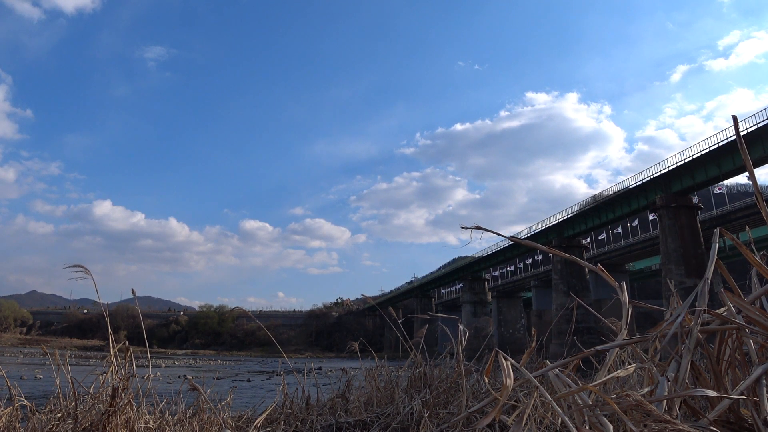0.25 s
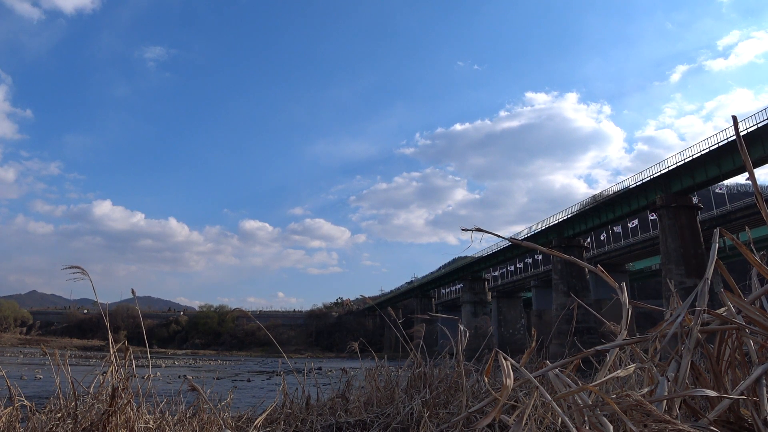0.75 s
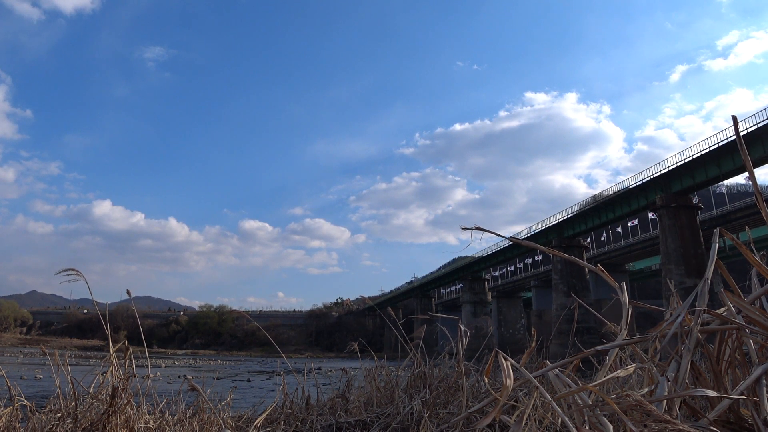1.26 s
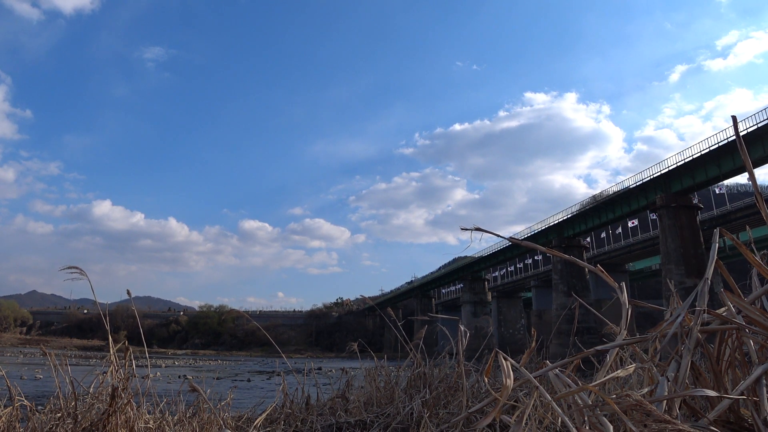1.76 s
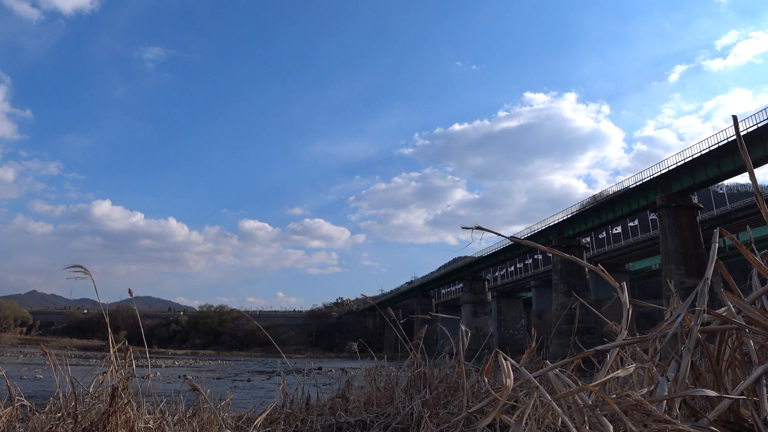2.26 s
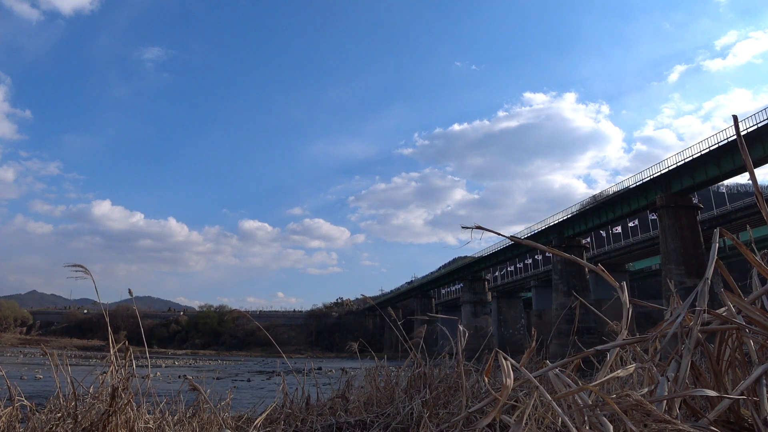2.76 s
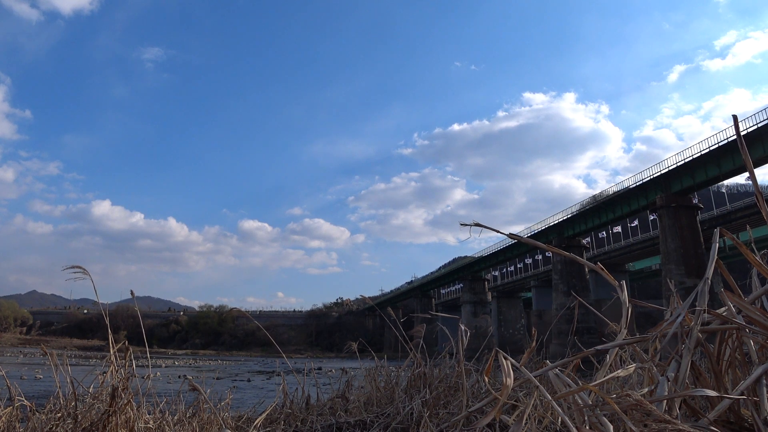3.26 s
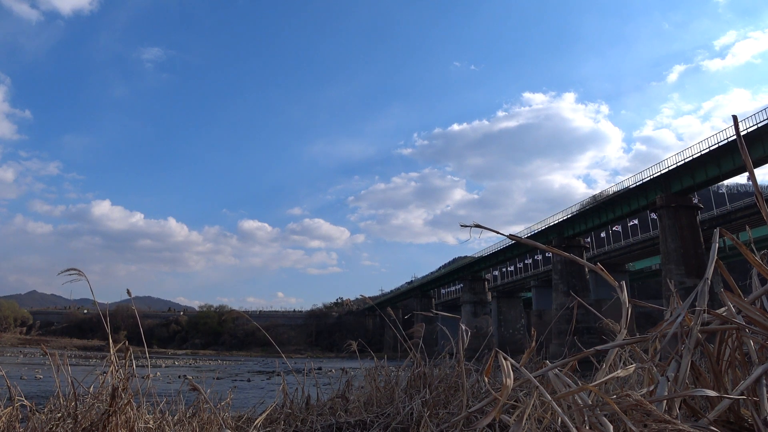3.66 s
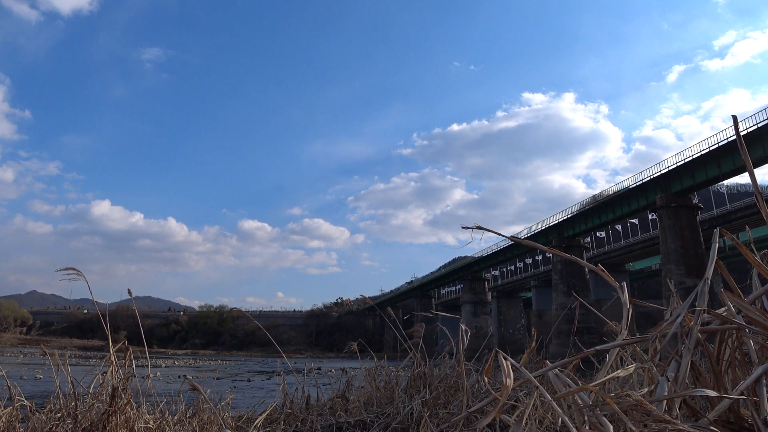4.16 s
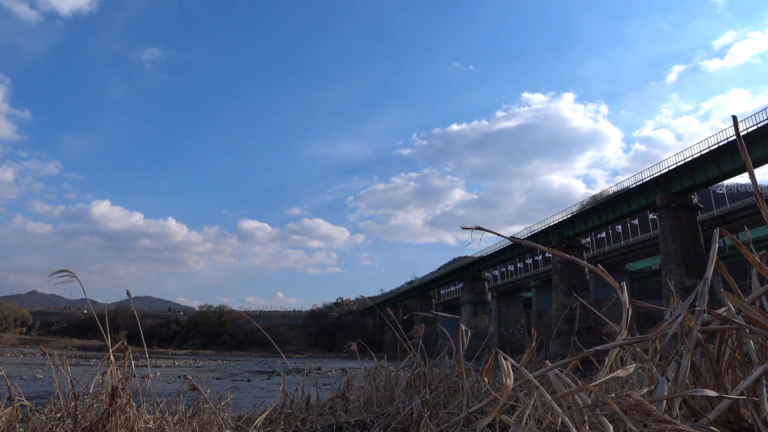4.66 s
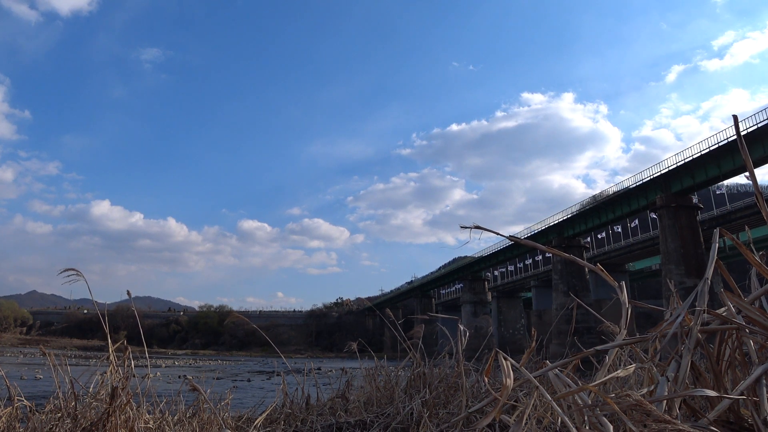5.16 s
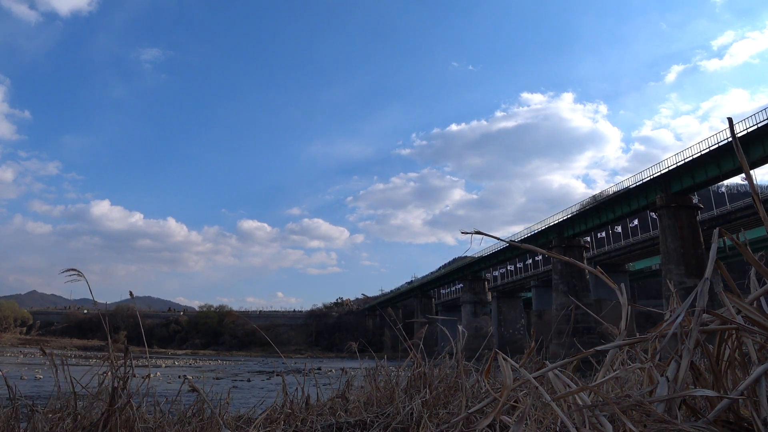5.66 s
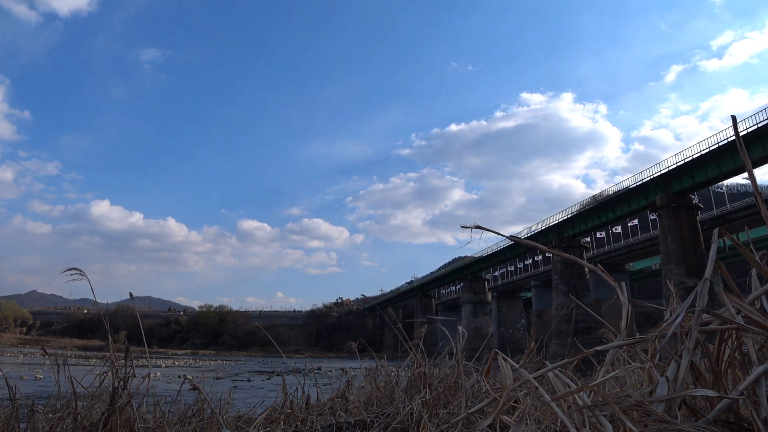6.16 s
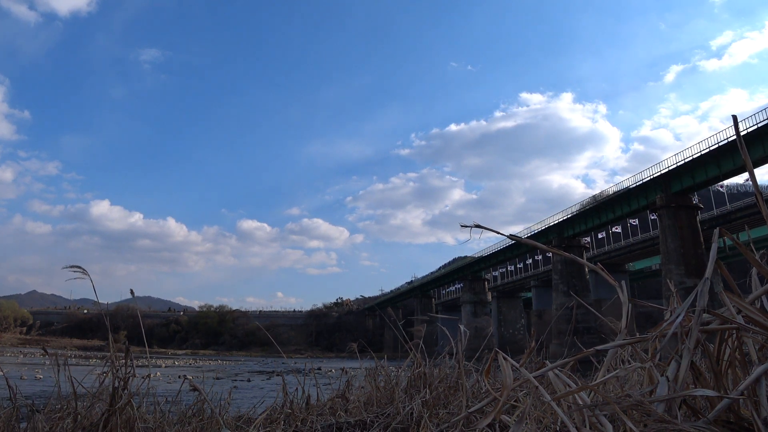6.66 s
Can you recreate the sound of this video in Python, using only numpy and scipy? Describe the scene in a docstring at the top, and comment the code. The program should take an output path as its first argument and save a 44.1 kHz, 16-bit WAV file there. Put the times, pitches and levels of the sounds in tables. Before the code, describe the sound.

Heard from below, a train's low rumble and wheel hiss build across a railway bridge, with booming spans, rattling steel and thin rapid squeaks.

```python
"""A deep rumble and a roar swell as a diesel railcar draws nearer on a girder bridge, heard from below.
Shaped noise with narrow humming and ringing tones makes the rumble, the wheels and the rails; gliding sines
make the deck's booms and the engine's hum. Bursts of noise with rising rings make the clanks of loose steel.
Thin squeaks in quick runs, small bright ticks and a faint twitter lie on top."""
import sys
import numpy as np
from scipy import signal
from scipy.fft import rfft, irfft, next_fast_len
from scipy.io import wavfile
from scipy.ndimage import uniform_filter1d, map_coordinates

SR = 44100
rng = np.random.default_rng(int(sys.argv[2]) if len(sys.argv) > 2 else 0)


def store_pcm(level_fs):
    """Save levels as 16-bit WAV."""
    pcm = np.round(np.clip(level_fs, -1, 1) * 32767).astype(np.int16)
    wavfile.write(sys.argv[1], SR, np.atleast_2d(pcm).T)


N = 304731

# The wheel hiss over time. Each row: time in seconds, level before the trims in dB.
HISS_LEVEL = [(0, -53.5), (.27, -57), (1.15, -55), (2.3, -52), (2.52, -49.5), (2.88, -52), (3.6, -48.5),
              (4.1, -47), (4.24, -49.5), (4.47, -45.5), (5.08, -46.5), (5.27, -44), (5.4, -46),
              (5.56, -42.8), (5.85, -43), (6.34, -47), (6.52, -44.3), (6.7, -43), (6.9, -44)]
# The upper rings of every tick. Each row: pitch in Hz, width in Hz, relative level in dB.
UPPER_TICK_MODES = [(11850, 650, 0), (12700, 500, -8)]
RUB_PERIOD_S = .0585  # pace of the squeaks and of the fainter ticks


def girders(uneven_db=0.64):
    """Wheel roughness drums the webs, harder on a loaded span; stiffer flanges emerge as the train nears."""
    # Colour of the webs' rumble. Each row: frequency in Hz, relative density in dB.
    web_spectrum = [(20, -25), (32, -8), (55, 0), (75, 0), (100, 0), (150, 0.5), (205, -0.5), (235, -5.5),
                    (350, -37), (590, -80)]
    # Colour of the flanges. Each row: frequency in Hz, relative density in dB.
    flange_spectrum = [(130, -63), (230, -3), (290, -1), (350, -5), (430, -5.5), (520, -8.5), (580, -15),
                       (660, -19), (830, -44), (1400, -100)]
    # Narrow humming tones within the low rumble. Each row: pitch in Hz, width in Hz,
    # level against the rumble's noise in dB.
    rumble_hums = [(145.4, 9.6, -12), (205.2, 10.5, -14)]
    # Narrow humming tones within the body of the rumble. Each row: pitch in Hz, width in Hz,
    # level against the body's noise in dB.
    body_hums = [(414, 14, -17), (542, 16, -18.5), (618, 23, -20)]
    # Bogies roll onto a span. Each row: crest in seconds, rise in dB, swell in seconds.
    surges = [(.42, 3.5, 0.056), (.8, 3.5, 0.099), (2.35, 2, 0.56), (3.7, 1.5, 0.35), (5.25, 1, .15)]
    low = rush(web_spectrum, patchy_db=0.1) + rubbed(rumble_hums)
    upper = rush(flange_spectrum, patchy_db=0.47) + rubbed(body_hums)
    surge = amp(sum(db * swell(s, width) for s, db, width in surges))
    rumble = growing(near_db=-17.5, grows_db=10) * low
    body = growing(near_db=-20.5, grows_db=14) * amp(uneven_db * wobble(6.5)) * upper
    return surge * (rumble + body)


def wheels(hiss_db=1, surge_db=0.5, flutter_db=0.78, catch_db=4):
    """Rolling contact roars, rings the rails and hisses in the wheel rims."""
    # Colour of the roar far off. Each row: frequency in Hz, relative density in dB.
    roll_far = [(320, -24), (560, 1.5), (680, -3.5), (780, -3.5), (880, -7.5), (1050, -5), (1350, -6.5),
                (1620, -4.5), (1900, -7), (2200, -15), (2750, -14), (3700, -19), (4400, -27), (6000, -46)]
    # Colour of the roar near by. Each row: frequency in Hz, relative density in dB.
    roll_near = [(320, -18), (560, -1), (680, 0), (790, 1), (900, -3), (1100, -3), (1650, -6),
                 (2100, -10.5), (2700, -13.5), (3600, -18.5), (4400, -25), (6000, -45)]
    # Colour of the hiss far off. Each row: frequency in Hz, relative density in dB.
    hiss_far = [(2800, -51), (4400, -2), (5300, 1.5), (6500, -0.5), (7000, -5.5), (7600, -6), (8300, -6.5),
                (10000, -10), (12000, -12.5), (13200, -45), (14400, -37), (15800, -49)]
    # Colour of the hiss near by. Each row: frequency in Hz, relative density in dB.
    hiss_near = [(2800, -42), (4400, 1), (5200, 0.5), (6000, -1.5), (7100, -1.5), (7700, -4), (8400, -4),
                 (10000, -9), (12100, -12), (13300, -26), (14300, -15), (15800, -37)]
    # Narrow rings of the wheels. Each row: pitch in Hz, width in Hz, level against the hiss in dB.
    rim_modes = [(9320, 120, -28), (11830, 900, -33)]
    sing_s, sing_swell_s, sing_range_db = 4.5, 1.95, 14.5  # the wheels cross the nearest span
    rolling = approaching(rush(roll_far, patchy_db=0.24), rush(roll_near, patchy_db=0.44))
    rails = amp(sing_range_db * (swell(sing_s, sing_swell_s) - 0.5)) * whine()
    rims = approaching(rush(hiss_far, patchy_db=0.0), rush(hiss_near, patchy_db=1.5))
    singing = rubbed(rim_modes) * amp(catch_db * wobble(30))  # the rims catch and let go
    roar = growing(near_db=-26.5, grows_db=9.5) * (rolling + rails)
    hiss_level = curves(HISS_LEVEL)[0] + hiss_db + surge_db * wobble(7.8) + flutter_db * wobble(50)
    return roar + amp(hiss_level) * (rims + singing)


def whine(pitch_hz=1067, level_db=-19.7, wander_hz=12):
    """The thin tone of the rail, wavering a little in pitch and level."""
    return amp(level_db + wobble(12)) * tone(pitch_hz + wander_hz * wobble(40))


def deck(drift_hz=0.73):
    """The spans shake all the time and boom at one low, drifting pitch as the axles load them."""
    # Booms under load. Each row: crest in seconds, level in dB, swell in seconds, pitch before drift in Hz.
    booms = [(.42, -30, 0.081, 40), (1.03, -24.5, 0.27, 41), (1.6, -24.5, 0.056, 42),
             (2.4, -27, 0.11, 39.5), (3.3, -19, 0.15, 39.5), (3.85, -20, 0.11, 42), (5.5, -23, 0.35, 43),
             (6.15, -25, 0.16, 48), (6.75, -37, 0.24, 49)]
    shake = rush([(18, -38), (26, -16), (33, -5), (48, -7), (62, -8), (100, -70)], patchy_db=1.5)
    pitch = curves([(s, hz) for s, _, _, hz in booms])[0] + drift_hz * wobble(8)
    load = sum(amp(db) * swell(s, width) for s, db, width, _ in booms)
    boom = load * unit(np.sin(2 * np.pi * np.cumsum(pitch) / SR))
    shaking = growing(near_db=-26.5, grows_db=9.5) * shake
    return np.array([boom + shaking[0], shaking[1]])


def engine(waver_db=1.7, wander_hz=0.097):
    """The diesel hums on multiples of its slightly sinking firing rate; each wavers in level by itself."""
    # The firing rate. Each row: time in seconds, rate before a slight wander in Hz.
    firing = [(0, 34.8), (2.4, 34.8), (6.9, 34.3)]
    # The orders of the hum. Each row: multiple of the firing rate, mean level in dB.
    orders = [(2, -39), (3, -43), (4, -35), (5, -35.5), (6, -35.5), (12, -47)]
    rate = curves(firing)[0] + wander_hz * wobble(5)
    return sum(amp(db + waver_db * wobble(3.04)) * tone(k * rate) for k, db in orders)


def clanks():
    """Loose steel knocks in rattling bursts of varied brightness; each leaves a ring that glides up."""
    # The knocks. Each row: crest in seconds, level in dB, tilt in dB per octave, swell in seconds,
    # ring against the knock in dB.
    knocks = [(.378, -33, -4.5, .026, -20), (.425, -34, -4, .028, -40), (.675, -31, -4, .034, -20),
              (2.375, -30, -3, .02, -40), (2.65, -29.5, -2, .02, -14), (3.21, -27.3, -5, .02, -6),
              (3.588, -23.8, 0, .009, -14), (3.84, -27, -1.5, .014, -16), (6.398, -26, -8, .011, 7),
              (6.62, -26.5, -6, .018, -4)]
    # Colour of a knock before tilt. Each row: frequency in Hz, relative density in dB.
    knock_spectrum = [(200, -22), (450, 0), (850, 0), (1300, -5), (2000, -9), (3000, -13), (3700, -20),
                      (4300, -15), (5200, -26), (8000, -48), (16000, -90)]
    # Rings left behind. Each row: final pitch before wander in Hz, relative level in dB, t60 in seconds.
    rings = [(825, -1, .24), (765, -6, .3)]
    tilt_hz = 810  # knocks differ in brightness above this pitch
    flat_hz, glide_s, wander_hz, attack_s = 75, .015, 16, .005  # rings start flat and glide up
    burst, out = rush(knock_spectrum, patchy_db=1), np.zeros((2, N))
    rattle = unit(amp(1.6 * wobble(130)))
    wander = [wander_hz * wobble(70) for _ in rings]
    for s, db, tilt, width, ring_db in knocks:
        knock = unit(filtered(burst, lambda hz: amp(tilt * np.log2(np.maximum(hz / tilt_hz, 1)))))
        age = np.maximum(np.arange(N) / SR - (s - width), 0)
        flat = flat_hz * np.exp(-age / glide_s)
        ring = 0
        for (hz, mode_db, t60), drift in zip(rings, wander):
            ring = ring + amp(ring_db + mode_db - 60 * age / t60) * tone(hz - flat + drift)
        onset = 1 - np.exp(-age / attack_s)
        out += amp(db) * (swell(s, width) * rattle * knock + onset * ring)
    return out


def squeak(level_db=-7, width=0.0035, delay=0.0033):
    """Short rubs on one high resonance, in runs of about 17 a second, uneven in strength and rough in pitch."""
    # Runs of rubs. Each row: first rub in seconds before the delay, number of rubs, level before trim in dB.
    runs = [(.622, 2, -50), (2.122, 4, -48), (2.408, 3, -46), (3.038, 1, -47), (3.215, 3, -40),
            (3.446, 3, -45), (3.735, 1, -41), (3.968, 4, -41), (4.431, 2, -44), (4.723, 2, -41),
            (4.955, 4, -41), (5.246, 1, -43), (5.362, 5, -42), (5.772, 6, -36), (6.477, 1, -39),
            (6.652, 2, -45)]
    rubs = 0
    for s, count, db in runs:
        for k in range(round(count)):
            rubs = rubs + amp(db) * swell(s + delay + k * RUB_PERIOD_S, width)
    pitch = 8520 + 55 * wobble(17) + 95 * wobble(600)  # Hz: slow wander, then roughness
    phase = 2 * np.pi * np.cumsum(pitch) / SR
    uneven = amp(1.3 * wobble(17))
    return amp(level_db) * uneven * rubs * np.array([np.sin(phase), np.cos(phase)])


def ticks(lower_db=-2, trim_db=-3, rough_hz=260):
    """Small scraping ticks: a rough lower tone and upper rings, in a balance that changes each time."""
    # The strongest ticks. Each row: start in seconds, lower ring before trims in dB,
    # its pitch before roughness in Hz, upper ring before trim in dB.
    strong_ticks = [(1.354, -43, 9310, -56), (2.379, -52, 9400, -50), (3.189, -44, 9400, -48),
                    (3.252, -42, 9490, -51), (3.311, -39, 9300, -47), (3.369, -47, 9400, -50),
                    (3.601, -37, 9490, -50), (3.881, -46, 9400, -43), (4.002, -33, 9300, -47),
                    (4.054, -37, 9250, -41), (4.116, -37, 9280, -42), (4.172, -45, 9350, -48),
                    (4.295, -47, 9350, -47), (4.346, -47, 9350, -47), (4.403, -45, 9400, -44),
                    (4.525, -39, 9400, -45), (4.582, -42, 9350, -46), (4.635, -46, 9350, -45),
                    (4.755, -45, 9350, -46), (4.815, -41, 9300, -45), (5.043, -46, 9400, -45),
                    (5.101, -47, 9400, -46), (5.16, -34, 9750, -44), (5.226, -46, 9400, -44),
                    (5.338, -41, 9500, -49), (5.395, -47, 9400, -46), (5.459, -45, 9400, -44),
                    (5.511, -39, 9250, -43), (5.568, -43, 9400, -37), (5.627, -38, 9600, -44),
                    (5.685, -45, 9500, -45), (5.801, -38, 10000, -47), (5.862, -39, 9600, -38),
                    (5.922, -35, 9070, -42), (5.978, -44, 9300, -44), (6.04, -41, 9100, -48),
                    (6.1, -42, 9400, -47), (6.158, -46, 9400, -46), (6.446, -45, 9300, -45),
                    (6.506, -37, 9500, -44), (6.575, -42, 9200, -42), (6.69, -39, 9000, -46),
                    (6.775, -43, 9300, -45)]
    out, shape = np.zeros((2, N)), tick_shape()
    upper, rough = rubbed(UPPER_TICK_MODES), rough_hz * wobble(1200)
    for s, low_db, hz, high_db in strong_ticks:
        start = round(s * SR)
        span = slice(start, start + len(shape))
        lower_ring = amp(low_db + lower_db) * tone(hz + rough[span])
        out[:, span] += shape * (lower_ring + amp(high_db) * upper[:, span])
    return amp(trim_db) * out


def ticking(level_db=-8):
    """Fainter ticks run on at about the pace of the squeaks, their level following the wheel hiss."""
    draws = rng.standard_normal((int(N / SR / RUB_PERIOD_S), 2))  # timing, strength
    when = (np.arange(len(draws)) + .5 + .2 * draws[:, 0]) * RUB_PERIOD_S
    places = np.clip(when * SR, 0, N - 1).astype(int)
    strikes = np.bincount(places, amp(1.8 * draws[:, 1]), N)
    fading = signal.fftconvolve(strikes, tick_shape())[:N]
    rings = unit(rubbed(UPPER_TICK_MODES + [(9350, 400, -1)]))
    return amp(curves(HISS_LEVEL)[0] + level_db) * fading * rings


def tick_shape(attack_s=.0012, t60_s=.04):
    """The quick rise and exponential fall of one tick."""
    t = np.arange(SR // 10) / SR
    return (1 - np.exp(-t / attack_s)) * amp(-60 * t / t60_s)


def drone(middle_s=1.77, swell_s=0.99, level_db=-29.5):
    """A low, narrow drone near the engine's hum, with a fainter tone above it, swells and fades early on."""
    # The two tones. Each row: pitch in Hz, width in Hz, level within the drone in dB.
    drone_tones = [(209.4, 6, -4), (538, 18, -13)]
    return amp(level_db) * swell(middle_s, swell_s) * rubbed(drone_tones)


def twitter():
    """Faint chirps at uneven moments, near the pitches of the squeaks and ticks."""
    # Spells of chirps. Each row: middle in seconds, swell in seconds, gain of the spell in dB.
    spells = [(2.75, .55, -66), (4.05, .1, -61), (4.7, .25, -61), (5.75, .25, -62)]
    chirps = rubbed([(8500, 400, -4), (9330, 180, -1.5), (11900, 800, -6)]) * amp(3.5 * wobble(90))
    return sum(amp(db) * swell(s, width) for s, width, db in spells) * chirps


def nearness():
    """How near the train is, 0 far to 1 nearest."""
    # The train comes on, then fills the bridge. Each row: time in seconds, nearness from 0 to 1.
    train = [(0, 0), (.7, 0.14), (1.4, 0.24), (2.5, 0.51), (2.95, 0.49), (3.6, 0.77), (4.25, 0.83),
             (5.2, 0.97), (5.85, 1), (6.3, 0.95), (6.9, 1)]
    return curves(train)[0]


def growing(near_db, grows_db):
    """Gain of a layer that reaches near_db at the nearest, having grown by grows_db from far off."""
    return amp(near_db - grows_db * (1 - nearness()))


def approaching(far, near, lateness=1.9):
    """Cross-fade at constant power from the distant colour to the near one."""
    share = np.clip(nearness(), 0, 1) ** lateness
    return np.sqrt(1 - share) * far + np.sqrt(share) * near


def amp(db):
    """Decibels to gain."""
    return 10 ** (np.asarray(db) / 20)


def unit(x):
    """Scale to rms 1."""
    return x / np.sqrt(np.mean(x ** 2) + 1e-20)


def along(points, hz):
    """Each column after the frequency, read on a log frequency axis."""
    f, *cols = np.transpose(points)
    return [np.interp(np.log(hz + 1), np.log(f + 1), c) for c in cols]


def curves(rows):
    """One value per sample for each column after the time."""
    s, *cols = np.transpose(rows)
    return [np.interp(np.arange(N) / SR, s, c) for c in cols]


def wobble(rate):
    """A smooth random curve, rate knots a second."""
    knots = rng.standard_normal(int(N * rate / SR) + 4)
    return map_coordinates(knots, [np.arange(N) * rate / SR])


def swell(s, width):
    """A bell-shaped rise and fall around time s."""
    return np.exp(-.5 * np.minimum(((np.arange(N) / SR - s) / width) ** 2, 100))


def tone(hz):
    """A pair of sines of rms 1, a quarter cycle apart, on a pitch curve."""
    phase = 2 * np.pi * np.cumsum(hz) / SR
    return np.sqrt(2) * np.array([np.sin(phase), np.cos(phase)])


def filtered(x, response):
    """Filter x by a complex response of frequency."""
    size = next_fast_len(N + SR // 2)
    return irfft(rfft(x, size) * response(np.fft.rfftfreq(size, 1 / SR)), size)[..., :N]


def rush(spectrum, patchy_db):
    """Two unrelated noises, of rms 1 together, that share patches of random gain."""
    z = signal.stft(rng.standard_normal((2, N)), nperseg=512)[2]
    field = uniform_filter1d(rng.standard_normal(z.shape[1:]), size=7, axis=0)  # over frequency
    field = uniform_filter1d(field, size=12, axis=1)  # over time
    pair = signal.istft(z * amp(patchy_db * unit(field)), nperseg=512)[1][:, :N]
    return unit(filtered(pair, lambda hz: amp(along(spectrum, hz)[0])))


def rubbed(modes):
    """Two noises, each the sum of narrow bands kept sounding at their own rms levels."""
    def ring(centre, width):
        noise = rng.standard_normal((2, N))
        return unit(filtered(noise, lambda hz: 1 / (1 + (2 * (hz - centre) / width) ** 2)))
    return sum(amp(db) * ring(centre, width) for centre, width, db in modes)


def microphones(pair):
    """Two close ports differ in level and phase by frequency; each blends a shared and an opposed noise."""
    # Between the ports. Each row: frequency in Hz, likeness from 0 to 1, left minus right in dB,
    # lead of the left in radians.
    ports = [(45, 1, 2.5, 0.33), (100, 1, 1, 0.25), (211, 1, -1.5, 0.6), (420, 0.94, -4.5, 0.74),
             (900, 0.83, -10, 0.53), (1670, 0.94, -11.5, 0.5), (2060, 0.25, -9.5, -0.5),
             (2250, 0.14, -12, -3), (3030, 0.33, -13, -5), (4360, 0.63, -5.5, -5.5), (6700, 0.67, -2, -6),
             (9000, 0.5, -5, -8), (10500, .3, -3.6, -7), (14000, .35, -2, -8.5)]

    def port(hz, sign):
        alike, balance_db, lead = along(ports, hz)
        alike = np.clip(alike, 0, 1)
        gain = amp(balance_db / 2)
        # size of the mean of both ports
        centre = np.sqrt(gain ** 2 + gain ** -2 + 2 * alike * np.cos(lead)) / 2
        blend = np.array([np.sqrt((1 + alike) / 2), sign * np.sqrt((1 - alike) / 2)])
        return gain ** sign * np.exp(.5j * sign * lead) / centre * blend

    return np.array([filtered(pair, lambda hz: port(hz, sign)).sum(axis=0) for sign in (1, -1)])


def scene():
    """Bridge and train together, stronger on the right from the low mids up."""
    train = deck() + engine() + girders() + wheels()
    details = clanks() + squeak() + ticks() + ticking() + drone() + twitter()
    return microphones(train + details)


def record(dry, ceiling=.85, top_hz=15800):
    """Round off the highest peaks and keep nothing above the band limit."""
    rounded = dry / (1 + np.abs(dry / ceiling) ** 8) ** (1 / 8)
    return filtered(rounded, lambda hz: hz < top_hz)


dry = scene()
out = record(dry)
store_pcm(out)
```